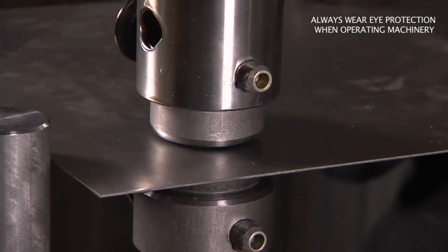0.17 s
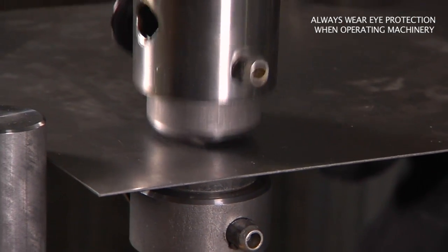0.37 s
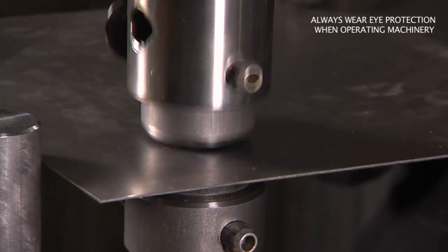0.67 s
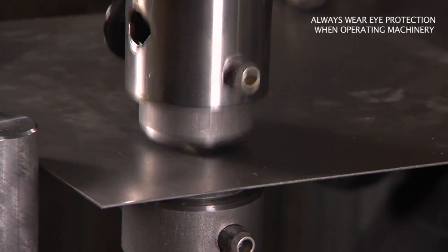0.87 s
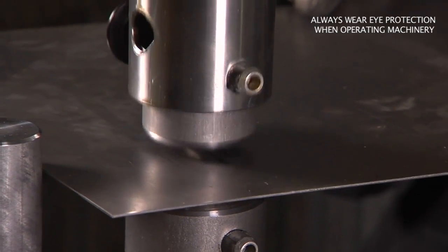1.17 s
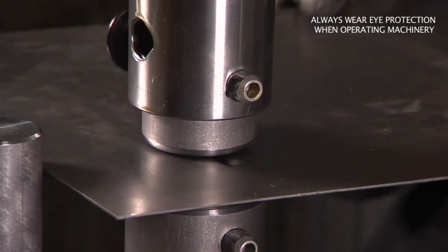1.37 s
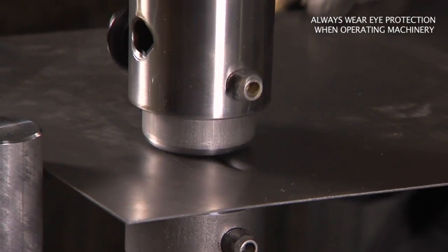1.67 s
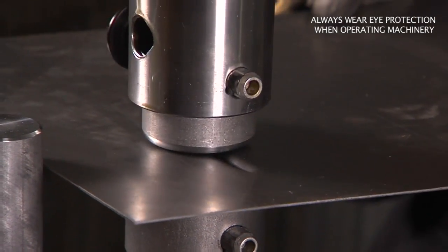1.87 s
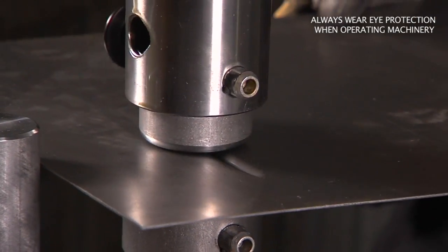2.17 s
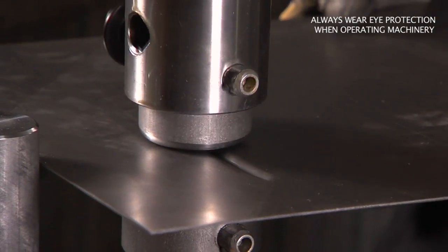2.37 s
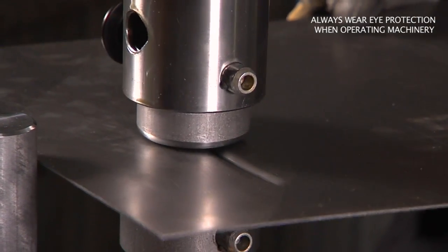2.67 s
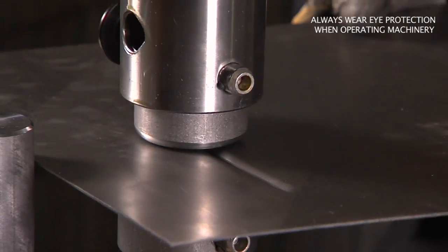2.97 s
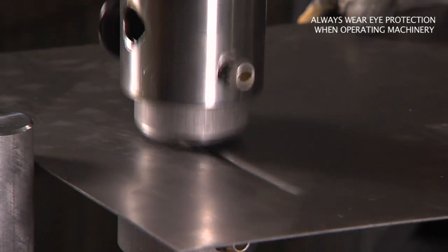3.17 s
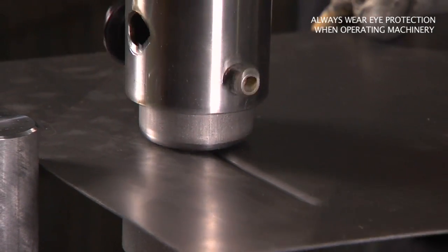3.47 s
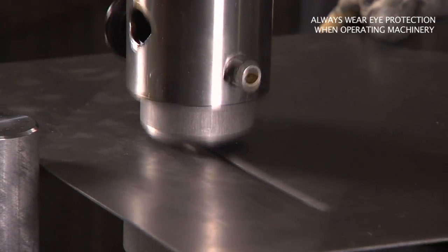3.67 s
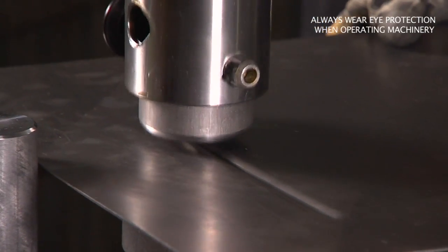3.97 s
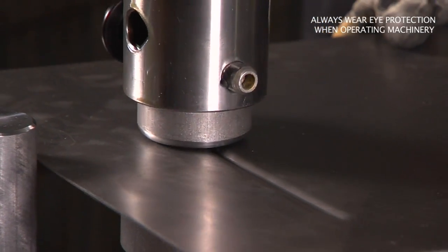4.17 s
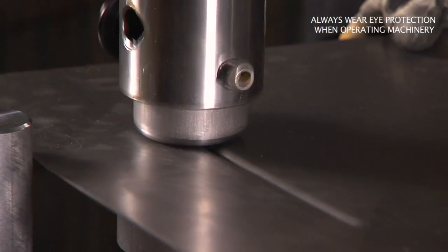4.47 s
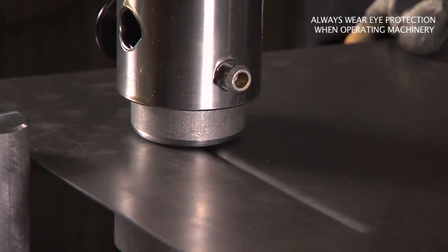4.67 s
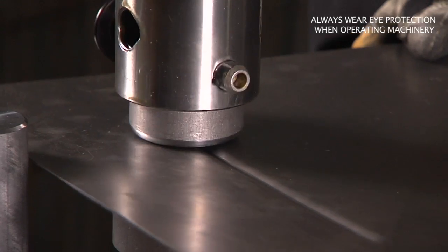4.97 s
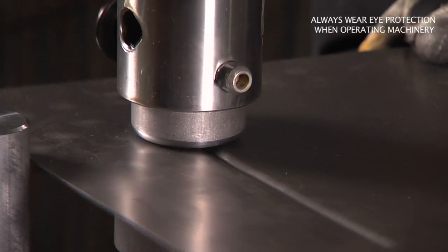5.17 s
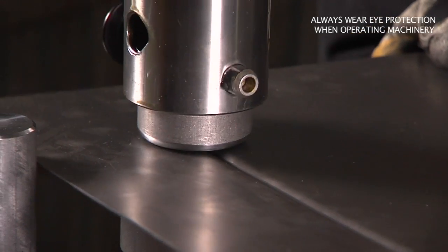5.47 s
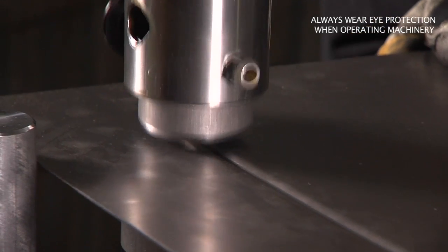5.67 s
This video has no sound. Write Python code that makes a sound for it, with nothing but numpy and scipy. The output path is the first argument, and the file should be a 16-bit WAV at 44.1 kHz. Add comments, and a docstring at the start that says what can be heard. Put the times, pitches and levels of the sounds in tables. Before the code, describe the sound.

Fast, steady machine hammering on a steel sheet, heard close, with sharp ticks and a continuous clanging ring.

```python
"""Power hammer on sheet steel

A workshop, one microphone close to a crank-driven hammer striking about 13.6 even blows a second.
In each stroke the die ticks on the steel, bending waves spread through the sheet (treble first, boom
last), the sheet slaps back as the ram lifts and the linkage clicks. The ring changes slowly as the
sheet is fed along."""
import sys
import numpy as np
from scipy import signal
from scipy.fft import rfft, irfft
from scipy.io import wavfile
from scipy.ndimage import uniform_filter1d

SR = 44100
rng = np.random.default_rng(int(sys.argv[2]) if len(sys.argv) > 2 else 0)


def to_wav(s):
    """Save 16-bit WAV."""
    ch = np.atleast_2d(s).T  # columns
    pcm = np.round(np.clip(ch, -1, 1) * 32767)  # PCM
    wavfile.write(sys.argv[1], SR, pcm.astype(np.int16))


N = 256662
RING = 12288  # samples in one ring
HZ = np.maximum(np.fft.rfftfreq(RING, 1 / SR), 1)
TOP_HZ = 16600  # top of the recorder's range


def undb(db):
    """Decibels to gain."""
    return 10 ** (np.asarray(db) / 20)


def level(x, db):
    """Scale to an rms level."""
    return x * undb(db) / np.sqrt(np.mean(x ** 2))


def colour(points):
    """Gain over frequency from (Hz, dB) points, falling away outside them."""
    hz, db = np.transpose(points)
    gain = undb(np.interp(np.log(HZ), np.log(hz), db))
    return gain * np.minimum(HZ / hz[0], 1) ** 2 * np.minimum(hz[-1] / HZ, 1) ** 2


def resonance(hz, width):
    """Response of one mode, gain 1 at its centre."""
    return 1 / (1 + 1j * hz / width * (HZ / hz - hz / HZ))


def walk(rate_hz):
    """Slow random drift with an rms of 1."""
    hold = int(SR / rate_hz)
    steps = np.repeat(rng.standard_normal(N // hold + 1), hold)
    slow = uniform_filter1d(uniform_filter1d(steps, hold), hold)[:N]
    return level(slow - slow.mean(), 0)


def along(curve, times):
    """Read each column of a curve at the given times."""
    time_s, *columns = np.transpose(curve)
    return [np.interp(times, time_s, column) for column in columns]


def play(times, sounds, db):
    """Lay one sound per stroke on the time line."""
    out = np.zeros(N + 2 * SR)
    for time_s, sound, gain in zip(times, sounds, undb(db)):
        start = int((time_s + 1) * SR)
        out[start:start + len(sound)] += gain * sound
    return out[SR:SR + N]


def ringing(times, gain, t60, room_db, room_t60, steady, memory, travel_s=0):
    """Crowded modes and room tail, one ring a stroke: part repeats, part drifts with the strike point."""
    t = np.arange(RING) / SR
    fade = np.hypot(undb(-60 * t / t60), undb(room_db - 60 * t / room_t60))
    rings = rfft(rng.standard_normal((len(times) + 1, RING)) * fade)
    carry = np.clip(memory, 0, .98)
    for k in range(2, len(rings)):
        rings[k] = carry * rings[k - 1] + np.sqrt(1 - carry ** 2) * rings[k]
    rings = np.sqrt(steady) * rings[0] + np.sqrt(1 - steady) * rings[1:]
    # bending waves speed up with the square root of frequency; travel_s is the delay at 1 kHz
    lag = np.exp(-4j * np.pi * travel_s * np.sqrt(1000 * HZ))
    return irfft(rings * gain * lag)


def sheet(times, db, hz, octaves, t60, travel_s, room_db, force_db=0, scatter_db=.5):
    """A sharp contact rings a band of the sheet's upper modes; short waves change soonest as it moves."""
    # dense upper modes: pitch_hz, gain_db
    crowd = [(250, -48), (480, 8.5), (800, 5), (1000, 2.5), (1120, -1.5), (1270, 1.5), (1520, 0),
             (1740, -7), (2050, -3), (2400, -5.5), (2900, -5.5), (4800, -5), (5500, -8.5), (10000, -2),
             (14000, -2)]
    # lightly damped modes that stand out of the crowd: pitch_hz, width_hz, gain_db
    steel_notes = [(1270.4, 23, -0.5), (1425, 25, -16), (1735, 30, 5), (1777, 41, 1.5), (2015, 69, -0.5),
                   (2330, 47, 2.5), (2444, 49, -2.5), (2576, 29, -4), (3080, 36, -5.5), (3610, 40, -6),
                   (3726, 30, 0), (4257, 54, -4), (4826, 38, -7)]
    peaks = 1 + sum(undb(gain_db) * resonance(pitch, width) for pitch, width, gain_db in steel_notes)
    band = np.exp(-(np.log2(HZ / hz) / octaves) ** 2)
    rings = ringing(times, colour(crowd) * peaks * band, t60, room_db, room_t60=.58,
                    steady=.73 * np.exp(-HZ / 5000), memory=np.exp(-HZ / 3500), travel_s=travel_s)
    blow_db = force_db - scatter_db * rng.standard_normal(len(times))
    return level(play(times, rings, blow_db), db)


def boom(times, force_db, uneven_db=.6):
    """The ram's shoves, never quite equal, drive low modes whose strength follows the strike point."""
    # heavy shoves in every stroke: after_blow_s, gain_db, peak_hz, roundness
    shoves = [(.0085, 2.5, 341, 1.4), (.0133, -4.5, 933, 4.8), (.0178, 8.5, 381.4, 2.12),
              (.0285, 7, 370.6, 3.83), (.0423, 0.7, 479, 5.4), (.0464, -5.5, 807, 5.5),
              (.0615, -5, 407, 2.5)]
    # low modes of sheet and frame, before the hands damp them: pitch_hz, width_hz, gain_db
    low_modes = [(133.75, 1.85, 1), (160.4, 11.1, 2.5), (205.23, 4.8, -9), (225.7, 17.7, -15.5),
                 (269.4, 12.1, -3), (287.4, 5.5, -11.5), (314.3, 8.8, -7.5), (330.4, 3.25, -2),
                 (376.6, 5.4, -10), (427.6, 18, -20), (478.9, 14.5, -12.5), (505, 9.8, -13.5),
                 (531.2, 3.8, -10), (607.6, 6, 3), (651.6, 10.4, -4), (716, 6.9, 2.5), (748, 3.1, 2.5),
                 (843, 1.6, -4), (849.4, 3.7, 5.5), (963, 17, -2.5), (998, 7.3, -4)]
    # the die passes over antinodes and nodes: time_s, half_length_s, centre_hz, half_width_hz, gain_db
    antinodes = [(0.088, 0.52, 333, 40, 6.5), (.1, 0.41, 193, 63, -8.5), (0.44, 1.3, 271, 15, 4),
                 (1.15, 0.52, 855, 15, 9), (0.18, 0.66, 685, 45, -8), (3.9, 0.59, 850, 25, 0),
                 (0.13, 0.17, 270, 7.6, -9), (4.97, 0.3, 437, 47, 6)]
    push = 0
    for after_s, db, hz, roundness in shoves:
        hump = (HZ / hz) ** 2 * np.exp(1 - (HZ / hz) ** 2)
        size = undb(db + uneven_db * rng.standard_normal(len(times)))
        push = push + np.outer(size, hump ** roundness * np.exp(-2j * np.pi * HZ * after_s))
    gains, shapes = [], []
    for hz, width, db in low_modes:
        damping = 1 + (hz / 850) ** 2  # gloved hands damp the higher modes
        shapes.append(resonance(hz, width * damping) / damping)
        place_db = sum(gain_db * np.exp(-((times - time_s) / span) ** 2 - ((hz - centre) / reach) ** 2)
                       for time_s, span, centre, reach, gain_db in antinodes)
        scatter = 1.2 * rng.standard_normal(len(times))
        wander = np.interp(times, np.arange(N) / SR, walk(rate_hz=2.55))
        shift_db = hz / 600 * (scatter + wander)  # shorter waves feel each shift of the sheet more
        gains.append(undb(db + place_db + shift_db))
    response = np.transpose(gains) @ np.array(shapes)
    return level(play(times, irfft(push * response), force_db), -29.5)


def die(times, top_db, body_db, scatter_db=.94, split_hz=9500, snap_s=.0064, spread_s=.005):
    """Hard steel on steel: a bright tick with a snap at its front; its top dies first."""
    # ring of the hardened die: pitch_hz, gain_db
    die_ring = [(2500, -17), (4000, -60), (4900, -10), (5800, -15.5), (7500, -11), (9000, -9),
                (10200, -2.5), (11300, 2), (12500, 2.5), (13300, -7), (14400, -7), (15100, -10),
                (15500, -26), (16100, -56)]
    top_share = 1 / (1 + (split_hz / HZ) ** 8)
    top = ringing(times, colour(die_ring) * np.sqrt(top_share), t60=.039,
                  room_db=-42, room_t60=.35, steady=.3, memory=.7)
    body = ringing(times, colour(die_ring) * np.sqrt(1 - top_share), t60=.073,
                   room_db=-16.5, room_t60=.28, steady=.23, memory=.3)
    force = undb(np.transpose([top_db, body_db]) + scatter_db * rng.standard_normal((len(times), 2)))
    snap = 1 + undb(7) * np.exp(-np.arange(RING) / SR / snap_s)
    ticks = (top * force[:, :1] + body * force[:, 1:]) * snap
    # even over the short way to the sheet's edge the highest notes run ahead
    lag_cycles = spread_s * (2 * np.sqrt(1000 * HZ) - HZ * np.sqrt(1000 / TOP_HZ))
    ticks = irfft(rfft(ticks) * np.exp(-2j * np.pi * lag_cycles))
    return level(play(times, ticks, np.zeros(len(times))), -31.5)


def tinks(times, force_db, scatter_db=.15, detune=.003):
    """Quickly damped modes of the sheet swell and die, their pitch barely shifting between strokes."""
    # short tinks in every stroke: after_blow_s, level_db, pitch_hz, width_hz
    notes = [(0.0103, -39.5, 1828, 150), (0.0395, -47, 1423, 149), (0.041, -44, 1705, 135),
             (0.0531, -43.5, 1740, 115), (.058, -52.5, 1883, 133)]
    out = 0
    for after_s, db, hz, width in notes:
        bend, size = rng.standard_normal((len(times), 2)).T
        rings = irfft(resonance(hz * (1 + detune * bend[:, None]), width) ** 2)
        out = out + level(play(times + after_s, rings, force_db - scatter_db * size), db)
    return out


def ring_and_clicks(times, jitter_s=.00063, scatter_db=2.5):
    """A thin steel ring near 4.8 kHz sings on from each blow; short linkage clicks follow."""
    # the thin ring, then three linkage clicks: after_blow_s, level_db, pitch_hz, width_hz, t60_s
    voices = [(.002, -52, 4800, 60, 1), (0.0395, -54, 8400, 2860, 0.032), (0.05, -51.5, 7100, 1770, 0.019),
              (.055, -75.5, 11000, 3000, 0.035)]
    out = 0
    for after_s, db, hz, width, t60 in voices:
        late, size = rng.standard_normal((len(times), 2)).T
        band = 1 / (1 + ((HZ - hz) / width * 2) ** 2)
        sounds = ringing(times, band, t60, room_db=-27, room_t60=.93, steady=.18, memory=.81)
        out = out + level(play(times + after_s + jitter_s * late, sounds, scatter_db * size), db)
    return out


def frame(times, force_db):
    """The heavy frame shudders faintly under each blow."""
    # rumble of the frame: pitch_hz, gain_db
    rumble = [(10, -5), (26, -1), (45, -7), (70, -5), (95, -2), (125, 1.5), (180, -1.5), (400, -49)]
    shudders = ringing(times, colour(rumble), t60=.54, room_db=-8, room_t60=.26, steady=.9, memory=.9)
    return level(play(times, shudders, force_db), -54)


def scene(first_s=.04779, stroke_s=.073685):
    """The hammer from close by, its crank already turning; each stroke is the same chain of contacts."""
    # how squarely the die seats on the sheet: time_s, tick_top_db, tick_body_db, crack_db
    seating = [(0, 0, 3, 3.5), (.5, 1, -3, -3.5), (.75, .5, -1.5, 1.5), (1.3, -2, 0, 2),
               (1.37, -4.5, -1, -6), (1.8, 0, -4, -3), (2.41, -1.5, -3, -4.5), (2.48, 1, 0, -2),
               (3.4, 1, -0.5, -3), (3.9, 0.5, 3, -1.5), (4.4, 2.2, 1.5, -1.5), (5.3, -2, 2.5, -0.5),
               (5.8, -4, 2, -0.5)]
    # odd blows that land unlike their neighbours: time_s, tick_top_db, tick_body_db, crack_db
    odd_blows = [(.122, 2, 1, -1), (.858, -6, 3, 1), (1.005, -1.5, 0, -1), (2.7, 1.5, -1, 0),
                 (3.732, 0, -1, 3), (4.395, -5, -1, -2), (5.28, 2, 2.5, -3)]
    # how the sheet answers as it is fed along: time_s, tink_db, boom_db, shudder_db
    feed = [(0, -2.5, 2.3, 0), (.4, -2.5, -1.5, -3), (1.2, -4, -0.5, -3.5), (1.5, -2, .7, -2),
            (2.6, -3, -0.4, -1.5), (3.4, -2.5, 0, -3.5), (4.4, -0.5, -0.1, -3), (4.8, -2, 0.5, -2),
            (5.3, -3.5, 0, 3), (5.8, -2, 1, 0)]
    strokes = np.arange(first_s - 4 * stroke_s, N / SR, stroke_s)  # four strokes are already ringing
    odd_db = sum(np.outer(db, abs(strokes - time_s) < stroke_s / 2) for time_s, *db in odd_blows)
    top_db, body_db, crack_db = along(seating, strokes) + odd_db
    tink_db, boom_db, shudder_db = along(feed, strokes)
    # blows are loudest as the die crosses the free edge of the sheet
    edge = np.exp(-((strokes - .11) / .16) ** 2)
    # the sheet cracks as the die bites; the die bounces once, more softly as the work goes on
    crack = sheet(strokes + .0004, db=-41, hz=4200, octaves=.84, t60=.07, travel_s=.000998,
                  room_db=-15, force_db=crack_db + 6 * edge)
    bounce = sheet(strokes + .0052, db=-40.5, hz=3050, octaves=.55, t60=.034, travel_s=.000399,
                   room_db=-36, force_db=5 * edge - .75 * strokes)
    strike = die(strokes, top_db, body_db) + crack + bounce + tinks(strokes, tink_db)
    # the sheet clangs, and its middle modes sing on from blow to blow
    clang = sheet(strokes + .002, db=-36, hz=1600, octaves=1.4, t60=.07, travel_s=.004,
                  room_db=-8.5, force_db=4.5 * edge)
    sing = sheet(strokes + .008, db=-34, hz=945, octaves=.84, t60=.83, travel_s=.012, room_db=-20)
    # the ram lets go, the sheet springs up and slaps back on the anvil
    lift = sheet(strokes + .0402, db=-37.5, hz=2280, octaves=1.38, t60=.035, travel_s=.001205, room_db=-9)
    slap = sheet(strokes + .0535, db=-39, hz=2930, octaves=1.21, t60=.032, travel_s=.001002, room_db=-10)
    steel = strike + clang + sing + lift + slap + boom(strokes, boom_db)
    return (steel + ring_and_clicks(strokes) + frame(strokes, shudder_db))[None]


def record(dry, ceiling=.6):
    """The recorder rounds the sharpest peaks and cuts the top."""
    rounded = ceiling * np.tanh(dry / ceiling)
    return signal.sosfilt(signal.ellip(10, .2, 80, TOP_HZ, fs=SR, output="sos"), rounded)


dry = scene()
out = record(dry)
to_wav(out)
```